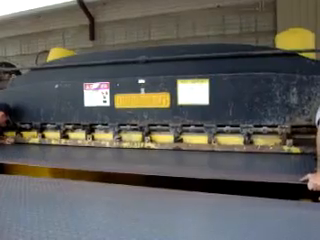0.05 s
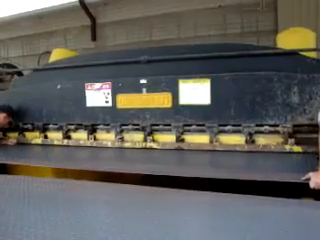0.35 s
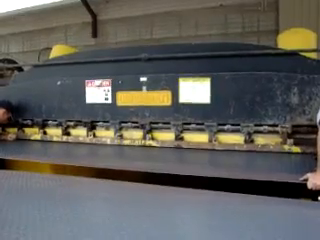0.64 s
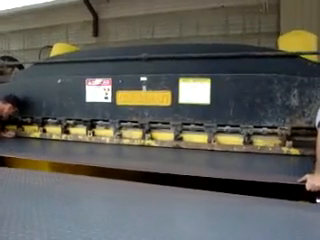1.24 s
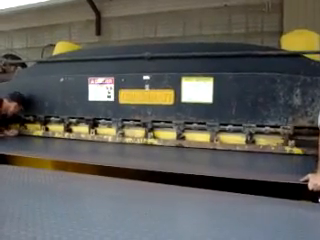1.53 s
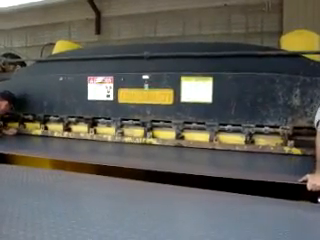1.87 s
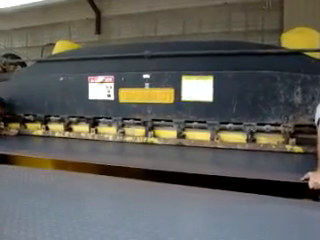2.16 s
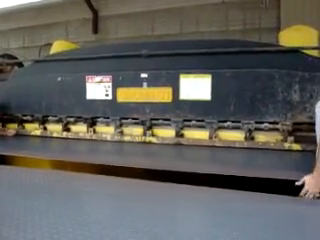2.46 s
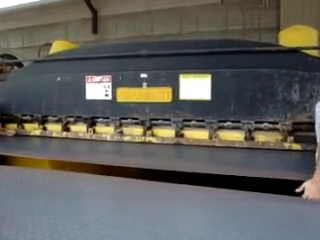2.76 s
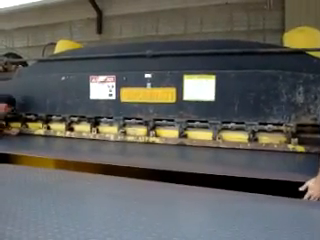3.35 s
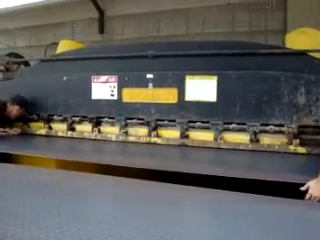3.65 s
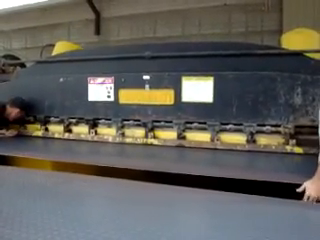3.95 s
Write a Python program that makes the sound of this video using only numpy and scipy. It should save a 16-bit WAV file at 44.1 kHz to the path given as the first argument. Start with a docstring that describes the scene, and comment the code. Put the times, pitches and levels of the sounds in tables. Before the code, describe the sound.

A large metal shear drones loudly while a steel plate rumbles, scrapes and clanks.

```python
"""Plate shear in a workshop.

The machine idles: gear whine and motor tones in a dense roar of fan, bearings and hall, with bright hiss.
A steel plate is pushed over the bed: it rumbles, scrapes, thumps and finally clanks against the stops.
A gain control ducks the drone after each loud clank."""
import sys
import numpy as np
from scipy import signal
from scipy.fft import rfft, irfft
from scipy.io import wavfile
from scipy.ndimage import uniform_filter1d, minimum_filter1d

SR = 44100
rng = np.random.default_rng(int(sys.argv[2]) if len(sys.argv) > 2 else 0)


def transcribe(signal):
    """Save signal, clipped to [-1, 1], as a 16-bit WAV file at the path in sys.argv[1]."""
    frames = np.atleast_2d(signal).T
    limited = np.clip(frames, -1, 1)
    pcm = np.round(limited * 32767).astype(np.int16)
    wavfile.write(sys.argv[1], SR, pcm)


N = 176400
T = np.arange(N) / SR

# roar of fan, bearings and hall: freq_hz, density_db
ROAR_SPECTRUM = [(25, -16), (45, -30), (62, -15), (130, -10.5), (280, -2), (420, -11.5), (470, -4),
                 (700, -5), (930, -9), (1350, -7.5), (1600, -3.5), (1760, -5.5), (1860, -7), (1950, -5.5),
                 (2100, -4.5), (2460, -11), (3000, -9.5), (3500, -5.5), (3750, -3), (3880, -3),
                 (4000, -1.5), (4150, -6.5), (4260, -5), (4380, -8.5), (4530, -12.5), (4700, -12.5),
                 (5000, -18), (5250, -25), (6200, -30), (6900, -39), (7300, -65.5)]
# housing resonances: freq_hz, boost_db
HOUSING_RESONANCES = [(1742, 0), (1945, 1), (2880, 0.5), (2965, 2), (3765, 0.5), (3965, -2), (4035, 3.5)]
# motor and drive tones: pitch_hz, level_db
MOTOR_TONES = [(60.8, -38.5), (113.1, -32.5), (126.0, -33.5), (159.6, -33.5), (249.6, -30), (301.2, -38),
               (414.1, -40.5), (453.9, -33), (474.3, -27), (605.7, -33.5), (888.7, -30.5), (1257.9, -35.5),
               (1303.1, -40.5), (1323.0, -29), (1394.1, -25.5), (1414.6, -32), (1435.2, -36),
               (1565.7, -33.5), (1585.8, -34.5), (1617.5, -50), (1657.1, -36), (1737.0, -33), (3310.3, -40),
               (3325.6, -43), (4152.8, -29.5)]
# tooth-rate harmonics: multiple, level_db
GEAR_HARMONICS = [(1, -49.5), (2, -36.5), (3, -31), (4, -37.5), (7, -47.5), (9, -48.5), (12, -40.5),
                  (13, -36), (14, -37.5), (15, -40), (16, -36), (17, -30.5), (18, -43), (19, -26.5),
                  (22, -34), (23, -32.5), (24, -31), (25, -33.5), (27, -44), (28, -38.5), (29, -43),
                  (30, -39.5), (31, -43.5), (32, -39.5), (33, -39), (34, -46), (35, -43), (36, -44),
                  (37, -35), (38, -32.5), (39, -43.5), (41, -31), (42, -31), (43, -34.5), (44, -30.5),
                  (45, -34), (47, -51), (48, -37)]
# rumble level as the plate is pushed: time_s, level_db
PUSH_CURVE = [(0, -23.5), (.45, -20), (.58, -18), (.8, -22.5), (.9, -22), (1.0, -18.5), (1.27, -21),
              (1.42, -31), (1.53, -19.5), (1.95, -19.5), (2.35, -16), (2.73, -23), (2.81, -31), (2.94, -22),
              (3.05, -23), (3.4, -17.5), (3.5, -23), (3.6, -20), (3.84, -18), (3.9, -33)]
# plate on the bed: freq_hz, density_db
RUMBLE_SPECTRUM = [(30, -30.5), (58, -11), (85, -12), (125, -3), (200, -5.5), (290, 1.5), (360, -1.5),
                   (420, -6), (520, -2.5), (900, -15.5), (2000, -17), (5000, -61)]
# plate's lowest bending mode: freq_hz, density_db
BOOM_SPECTRUM = [(35, -37), (55, 5.5), (66, 3.5), (85, -12), (115, -4), (180, -28.5), (1000, -76.5)]
# plate's ringing modes: freq_hz, boost_db
PLATE_RESONANCES = [(595, 5), (678, 6), (760, 8), (900, 4), (1080, 7.5), (1200, 6.5), (1370, 7)]
# edge strokes: start_s, hold_s, level_db
SCRAPE_STROKES = [(1.862, 0.079, -24), (2.719, 0.09, -14.5), (2.863, 0.058, -18.5), (3.004, 0.17, -27),
                  (3.256, 0.056, -35)]
# scraping edge: freq_hz, density_db
SCRAPE_SPECTRUM = [(200, -36.5), (430, -15.5), (580, 1.5), (800, 1.5), (1100, 4), (1450, 0), (1900, -14),
                   (3000, -5.5), (4200, -8.5), (6000, -50)]
# dull blows: start_s, level_db
THUMP_HITS = [(0.539, -19), (1.516, -9), (2.582, -11), (2.999, -12), (3.155, -16), (3.376, -13),
              (3.469, -18)]
# dull blow: freq_hz, density_db
THUMP_SPECTRUM = [(30, -30.5), (60, -21), (115, 5.5), (200, -7.5), (300, -0.5), (600, -26.5), (3000, -58.5)]
# steel-on-steel blows: start_s, level_db, tilt_db_per_octave, lowpass_hz
CLANK_HITS = [(0.343, -20.5, -1, 7000), (0.844, -14, 2.5, 7000), (2.799, -9.5, -2.5, 7000),
              (2.934, -10, -0.5, 6960), (3.379, -13, -1.5, 7000), (3.488, -20, 10, 7000),
              (3.499, -13, 6, 7000), (3.527, -2.5, 1, 3640), (3.544, -9, -2, 3870), (3.709, -6, 1.5, 7000),
              (3.733, -17, 13, 7000), (3.831, -17, 16.5, 6000), (3.863, 4.5, -1.5, 6500)]
# steel-on-steel blow: freq_hz, density_db
CLANK_SPECTRUM = [(30, -18.5), (150, -16), (500, -10), (1050, -6), (1500, -8.5), (2400, -6), (3100, -2),
                  (3700, 5), (4100, 2), (4700, -8.5), (5500, -16.5), (6500, -26.5), (7300, -50.5)]
# clear tones in every clank: pitch_hz, relative_db, decay_s
CLANK_TONES = [(1083, -10.5, 0.014), (4097, -11.5, 0.018)]

TILT_PIVOT_HZ = 3510


def from_db(db):
    """Decibels to gain."""
    return 10 ** (np.asarray(db) / 20)


def unit_rms(x):
    """Scale to rms 1."""
    return x / np.sqrt(np.mean(x ** 2) + 1e-20)


def drift(rate_hz):
    """Smooth random curve, rms about 1."""
    hop, settle = 100, 1000
    pole = np.exp(-2 * np.pi * rate_hz * hop / SR)
    white = rng.standard_normal(N // hop + settle + 2)
    slow = signal.lfilter([1], [1, -2 * pole, pole * pole], white)[settle:]
    return np.interp(np.arange(N) / hop, np.arange(len(slow)), unit_rms(slow))


def noise(spectrum, tilt_db_per_octave=0, modes=()):
    """Coloured noise, rms 1, with a ripple of dense steel and hall resonances and optional modes."""
    ripple_db, ripple_spacing_hz, mode_width_hz = 1.2, 12, 29
    freq_hz = np.fft.rfftfreq(N, 1 / SR)
    octave = np.log2(np.maximum(freq_hz, 1))
    points_hz, points_db = np.transpose(spectrum)
    colour_db = np.interp(octave, np.log2(points_hz), points_db)
    colour_db += tilt_db_per_octave * (octave - np.log2(TILT_PIVOT_HZ))
    ripple = rng.uniform(-1, 1, size=2000) * np.sqrt(3)
    colour_db += ripple_db * np.interp(freq_hz / ripple_spacing_hz, np.arange(len(ripple)), ripple)
    for mode_hz, boost_db in modes:
        colour_db += boost_db / (1 + (2 * (freq_hz - mode_hz) / mode_width_hz) ** 2)
    return unit_rms(irfft(rfft(rng.standard_normal(N)) * from_db(colour_db), N))


def flicker(x, shared_db, own_db, rate_hz):
    """Octave bands swell and sink, partly together, partly alone."""
    octave = np.log2(np.maximum(np.fft.rfftfreq(N, 1 / SR), 1))
    centres = np.arange(6, 14)  # octaves, 64 to 8192 Hz
    spectrum = rfft(x)
    together_db = shared_db * drift(rate_hz)
    out = np.zeros(N)
    for weights in np.eye(len(centres)):
        band = irfft(spectrum * np.interp(octave, centres, weights), N)
        out += band * from_db(together_db + own_db * drift(rate_hz))
    return out


def envelope(start_s, attack_s, decay_s, hold_s=0):
    """Linear rise, hold, exponential fall."""
    rise = np.clip((T - start_s) / attack_s, 0, 1)
    return rise * np.exp(-np.maximum(T - start_s - attack_s - hold_s, 0) / decay_s)


def tone(pitch_hz, rms_db):
    """Sine following a pitch curve and a level, random phase."""
    return np.sqrt(2) * from_db(rms_db) * np.sin(2 * np.pi * (np.cumsum(pitch_hz) / SR + rng.random()))


def roar():
    """Fan, bearing and hall noise, coloured by the housing."""
    rush = noise(ROAR_SPECTRUM, modes=HOUSING_RESONANCES)
    return from_db(-15) * flicker(rush, shared_db=1.47, own_db=0.57, rate_hz=16.2)


def motor():
    """Hum and whine of the drive; each tone wavers alone."""
    gain_db, waver_db, wander_hz = -3.5, 1.5, 0.61
    return sum(tone(pitch_hz + wander_hz * drift(4.1), gain_db + level_db + waver_db * drift(3.35))
               for pitch_hz, level_db in MOTOR_TONES)


def gears():
    """Meshing teeth: harmonics locked to one nearly constant speed."""
    mean_tooth_hz, speed_wander = 89.866, 0.00027
    gain_db, waver_db = -0.4, 2
    tooth_hz = mean_tooth_hz * (1 + speed_wander * drift(2.34))
    return sum(tone(multiple * tooth_hz, gain_db + level_db + waver_db * drift(6.1))
               for multiple, level_db in GEAR_HARMONICS)


def plate_rumble():
    """The plate rumbles as it is pushed over the bed."""
    push = from_db(np.interp(T, *np.transpose(PUSH_CURVE)))
    return push * flicker(noise(RUMBLE_SPECTRUM), shared_db=-1.0, own_db=-1.54, rate_hz=21)


def plate_boom():
    """The lowest bending mode booms during the last push."""
    swell = envelope(start_s=3.12, attack_s=0.022, decay_s=0.19, hold_s=0.72)
    return from_db(-31.5) * swell * noise(BOOM_SPECTRUM)


def plate_scrapes():
    """Short strokes of the edge set the plate's modes ringing."""
    strokes = sum(from_db(level_db) * envelope(start_s, attack_s=0.022, decay_s=0.19, hold_s=hold_s)
                  for start_s, hold_s, level_db in SCRAPE_STROKES)
    friction = noise(SCRAPE_SPECTRUM, modes=PLATE_RESONANCES)
    return strokes * flicker(friction, shared_db=0.5, own_db=-0.1, rate_hz=36)


def plate_thumps():
    """Dull blows of the plate: short bursts of low noise."""
    blows = sum(from_db(level_db) * envelope(start_s, attack_s=0.004, decay_s=0.014)
                for start_s, level_db in THUMP_HITS)
    return blows * noise(THUMP_SPECTRUM)


def plate_clanks():
    """Steel on steel excites the plate's modes: short ring, hall tail; soft contact dulls the top."""
    attack_s, decay_s = 0.0028, 0.016
    out = np.zeros(N)
    for start_s, level_db, tilt_db_per_octave, lowpass_hz in CLANK_HITS:
        blow = envelope(start_s, attack_s, decay_s)
        hall_tail = from_db(-12) * envelope(start_s, attack_s=decay_s, decay_s=0.1)
        ring = np.zeros(N)
        for pitch_hz, relative_db, ring_decay_s in CLANK_TONES:
            ring_db = relative_db + tilt_db_per_octave * np.log2(pitch_hz / TILT_PIVOT_HZ)
            ring += tone(np.full(N, pitch_hz), ring_db) * envelope(start_s, attack_s, ring_decay_s)
        burst = (blow + hall_tail) * noise(CLANK_SPECTRUM, tilt_db_per_octave, PLATE_RESONANCES)
        contact = signal.butter(4, lowpass_hz, fs=SR, output="sos")
        out += from_db(level_db) * signal.sosfilt(contact, burst + ring)
    return out


def scene():
    """Machine and plate from in front of the bed, mono."""
    machine = gears() + motor() + roar()
    plate = plate_rumble() + plate_boom() + plate_scrapes() + plate_thumps() + plate_clanks()
    return (machine + plate)[None]


def gain_control(x):
    """Ducks fast on loud treble, recovers slowly."""
    highpass_hz, window_s, threshold_db, release_db_per_s = 1810, 0.0057, -13.5, 23
    treble = signal.sosfilt(signal.butter(2, highpass_hz, "high", fs=SR, output="sos"), x[0])
    pole = np.exp(-1 / (window_s * SR))
    power = signal.lfilter([1 - pole], [1, -pole], treble ** 2)
    over_db = np.maximum(10 * np.log10(power + 1e-12) - threshold_db, 0)
    release_db = release_db_per_s * T
    duck_db = np.maximum.accumulate(over_db + release_db) - release_db
    return x * from_db(-duck_db)


def limiter(x, ceiling, window_s):
    """Smoothed gain dips around peaks above the ceiling."""
    span = int(window_s * SR)
    gain = ceiling / np.maximum(np.abs(x), ceiling)
    return x * uniform_filter1d(minimum_filter1d(gain, span), span)


def record(dry):
    """Gain control, peak limiter, steep low-pass."""
    cutoff_hz = 7150
    limited = limiter(gain_control(dry), ceiling=0.92, window_s=0.002)
    return signal.sosfilt(signal.ellip(12, 0.2, 90, cutoff_hz, fs=SR, output="sos"), limited)


dry = scene()
out = record(dry)
transcribe(out)
```